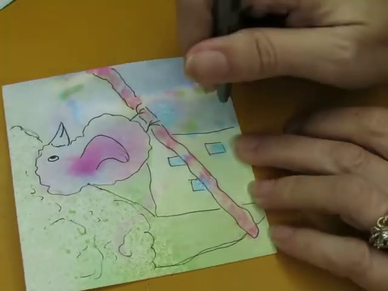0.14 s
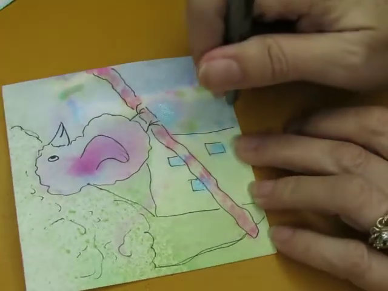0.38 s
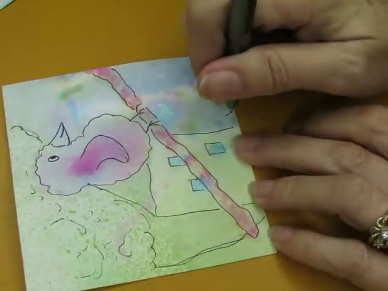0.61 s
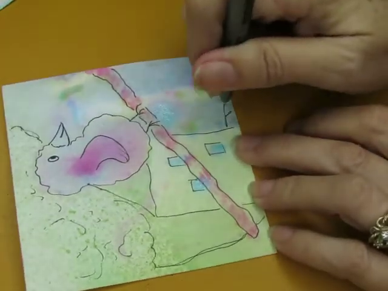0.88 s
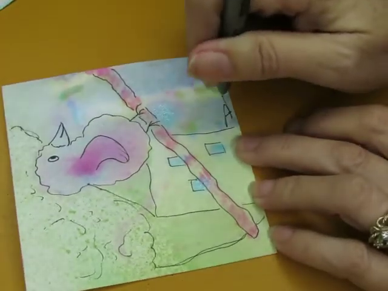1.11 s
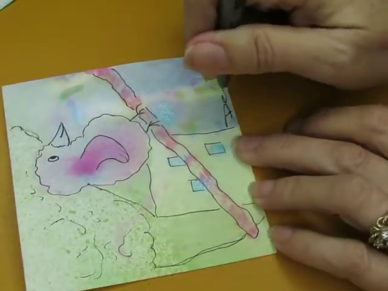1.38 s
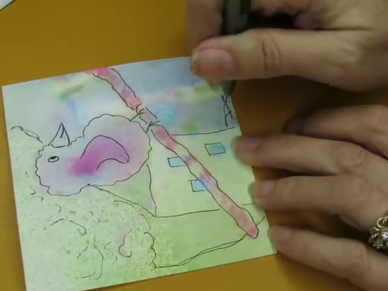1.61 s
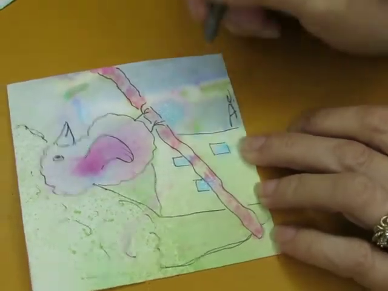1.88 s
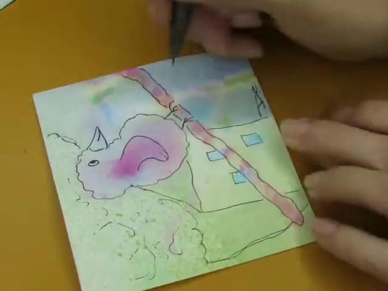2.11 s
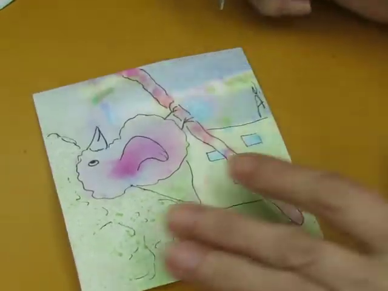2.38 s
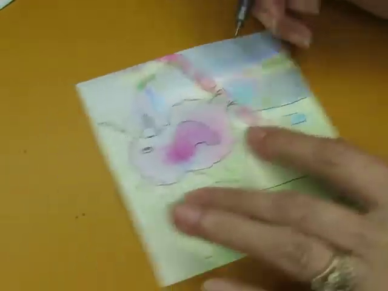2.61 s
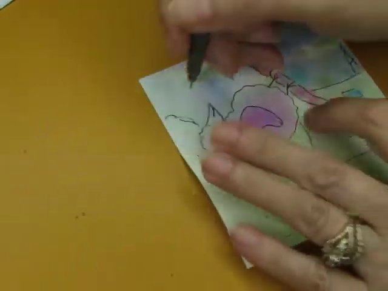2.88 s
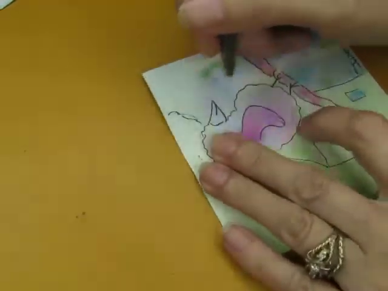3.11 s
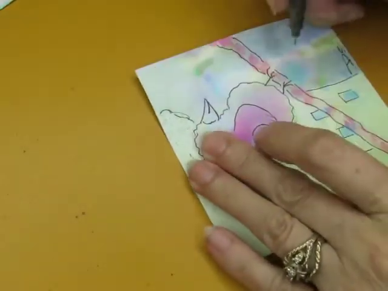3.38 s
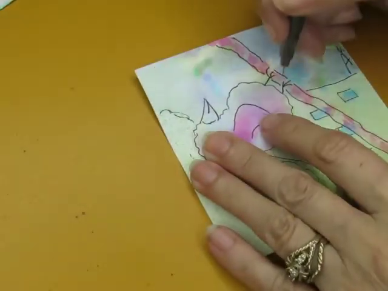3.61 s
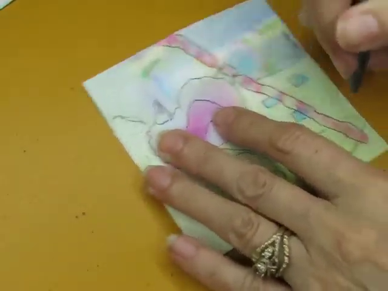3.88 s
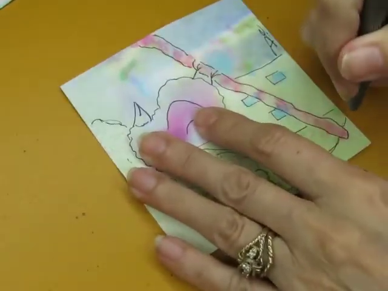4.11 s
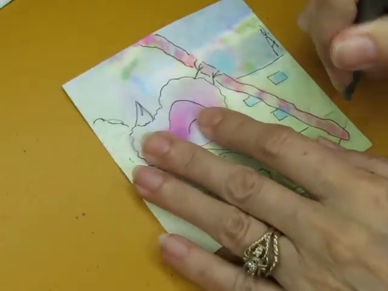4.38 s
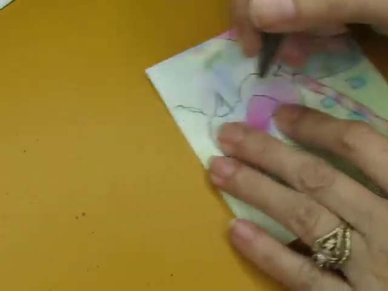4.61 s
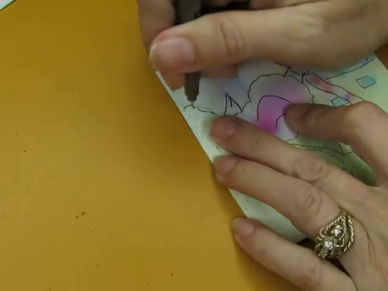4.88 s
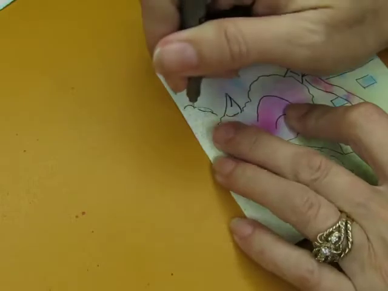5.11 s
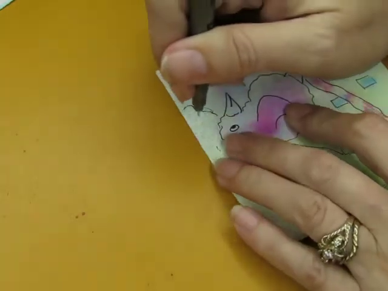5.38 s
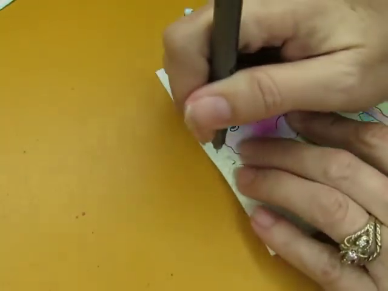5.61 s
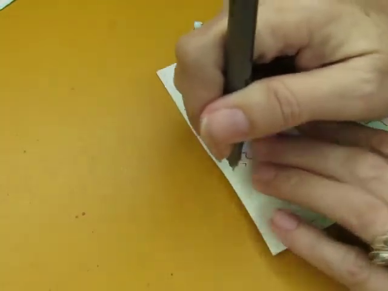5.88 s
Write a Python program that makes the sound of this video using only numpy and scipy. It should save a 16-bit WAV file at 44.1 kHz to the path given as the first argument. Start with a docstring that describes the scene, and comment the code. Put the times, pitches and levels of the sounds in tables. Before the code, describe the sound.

Faint pen strokes on paper in a quiet humming room, a sharp knock and scrape, then a paper sheet sliding over a wooden table.

```python
"""Over a quiet room's hiss, drone and motor tone, a sheet rubs faintly on a wooden table.
A fine pen makes short strokes, its nib dragging over fibres; two light taps ring the table top.
A stand is knocked and scrapes a moment: blows and slips ring its modes, and the jolted sheet rustles.
Then a hand slides the sheet several times, in overlapping swells of banded noise, amid more taps.
The pen taps down again near the end. Two close microphones hear it all."""
import sys
import numpy as np
from scipy import signal
from scipy.fft import rfft, irfft
from scipy.io import wavfile
from scipy.ndimage import uniform_filter1d

SR = 44100
rng = np.random.default_rng(int(sys.argv[2]) if len(sys.argv) > 2 else 0)


def store_wav(level_fs):
    """Save 16-bit WAV to argv[1]."""
    pcm = np.round(np.clip(np.atleast_2d(level_fs), -1, 1) * 32767)
    wavfile.write(sys.argv[1], SR, pcm.T.astype(np.int16))


def field_ratio(decibels):
    """Amplitude ratio for a level in dB (20 dB per decade); scalars and array-likes work."""
    return 10 ** (np.asarray(decibels, dtype=float) / 20)


N = 264600
T = np.arange(N) / SR  # s
F = np.maximum(np.arange(N // 2 + 1) * SR / N, 1)  # Hz, kept off 0 for the logs


def level(x, db):
    """Scale to an rms level."""
    return x * field_ratio(db) / np.sqrt(np.mean(x ** 2))


def shape(points):
    """Gain over frequency from (f/Hz, gain/dB) points, joined on a log axis."""
    hz, db = np.transpose(points)
    return field_ratio(np.interp(np.log(F), np.log(hz), db))


def bump(hz, width_hz):
    """Gain of one resonance, -3 dB at the edges of its width."""
    return 1 / np.sqrt(1 + (2 * (F - hz) / width_hz) ** 2)


def colour(x, gain):
    """Filter by a gain over frequency."""
    return irfft(rfft(x) * gain, N)


def walk(rate_hz):
    """Random levels held 1 / rate_hz and slewed twice; spread near 1."""
    k = int(SR / rate_hz)
    held = np.repeat(rng.standard_normal(N // k + 1), k)
    return 1.71 * uniform_filter1d(uniform_filter1d(held, k), k)[:N]


def grit(spread_db, flicker_db, rate_hz):
    """Fibres catching: noise whose samples vary in size, under a quick flicker."""
    size_db = spread_db * rng.exponential(size=N)
    return rng.standard_normal(N) * field_ratio(size_db + flicker_db * walk(rate_hz))


def patchy(x, patchy_db, rate_hz):
    """Narrow bands of a rub swell and fade apart as the contact shifts."""
    spectrum = rfft(x)
    place = 5 * np.log2(F / 200)  # five bands an octave
    out = 0
    for k in range(33):
        band = irfft(spectrum * np.clip(1 - abs(place - k), 0, 1), N)
        out = out + band * field_ratio(patchy_db * walk(rate_hz))
    return out


def half_sine(start_s, length_s):
    """Speed of one movement: up from rest and down again."""
    return np.sin(np.pi * np.clip((T - start_s) / length_s, 0, 1)).clip(0)


def push(contact_ms):
    """A smooth push of unit area; a longer contact is duller."""
    form = np.sin(np.pi * np.clip(T[:128] * 1000 / contact_ms, 0, 1)) ** 2
    return form / np.sum(form)


def ring(force, modes, low_hz, damping=1, sense=-1):
    """Modes answer a force, neighbours with or against each other; the small body radiates no deep bass."""
    out = 0
    for k, (hz, db, t60_s) in enumerate(modes):
        pole = np.exp(2j * np.pi * hz / SR - damping * np.log(1000) / (t60_s * SR))
        mode = signal.lfilter([1], [1, -pole], force).imag
        out = out + sense ** k * field_ratio(db) * mode
    return signal.sosfilt(signal.butter(3, low_hz, "high", fs=SR, output="sos"), out)


def scatter(x, decay_ms):
    """A short, dense cluster of reflections of unit energy."""
    path = rng.standard_normal(1024) * np.exp(-T[:1024] * 1000 / decay_ms)
    return signal.fftconvolve(x, path / np.sqrt(np.sum(path ** 2)))[:N]


def spread(mid, side_points):
    """Two ports: the side carries the same sound through a scattered path."""
    side = colour(scatter(mid, 9.1), shape(side_points))
    return np.array([mid + side, mid - side])


# room hiss spectrum: (f/Hz, relative density/dB)
AIR_SPECTRUM = [(12, -43), (20, -21), (59, -2.5), (112, -7.5), (175, -1), (245, -9), (404, -10),
                (505, -12.5), (834, -14), (1070, -18.5), (1160, -18.5), (3450, -27.5), (11400, -42.5),
                (14300, -46), (15500, -76)]
# side over mid: (f/Hz, gain/dB)
AIR_SIDE_GAIN = [(30, -19), (60, -7), (125, -13.5), (250, 9), (500, 5), (1000, 4), (3000, 2), (8000, 1),
                 (14000, 0.5)]
# drone, narrow noise bands: (f/Hz, -6 dB width/Hz, level/dB)
DRONE_BANDS = [(161, 41, -59.5), (411, 50, -66), (578, 36, -67)]
AIR_DB = -53  # before flicker
MOTOR_HZ, MOTOR_DB = 71, -62


def air_bed():
    """Flickering hiss of the room air plus narrow noise bands of the drone."""
    hiss = level(colour(rng.standard_normal(N), shape(AIR_SPECTRUM)), AIR_DB) * field_ratio(0.99 * walk(15))
    drone = sum(level(colour(rng.standard_normal(N), bump(hz, width_hz) ** 2), db)
                for hz, width_hz, db in DRONE_BANDS)
    return hiss + drone


def motor():
    """A sine wavering in pitch and level."""
    phase = 2 * np.pi * np.cumsum(MOTOR_HZ + 2 * walk(5)) / SR
    return level(np.sin(phase) * field_ratio(2 * walk(3.19)), MOTOR_DB)


def air():
    """Air, drone and motor tone at two ports; the side is weak in the deep bass, so both ports agree there."""
    mid = air_bed() + motor()
    side = colour(air_bed(), shape(AIR_SIDE_GAIN))
    return np.array([mid + side, mid - side])


ROOM_T60_S, ROOM_DB = 0.083, -29  # ROOM_DB: tail energy re direct


def room(near):
    """Decaying noise tails, independent at each port, 6 ms after the direct sound."""
    t = T[:SR // 2]
    tail = rng.standard_normal((2, SR // 2)) * field_ratio(-60 * t / ROOM_T60_S) * (t > .006)
    tail = level(tail, ROOM_DB) / np.sqrt(SR // 2)
    return signal.fftconvolve(near[None], tail, axes=1)[:, :N]


# stand modes: (f/Hz, level/dB, t60/s at damping 1)
STAND_MODES = [(274, -9, 0.055), (370, -13.5, 0.048), (580, -1.5, 0.042), (710, -2.5, 0.022),
               (1000, -9.5, 0.05), (1103, -7, 0.047), (1323, -11.5, 0.075), (1460, -8, 0.039),
               (1680, 6.5, 0.01), (2020, -1, 0.021), (2327, -6.5, 0.022), (2660, -4, 0.014),
               (3000, -8, 0.029), (3240, -12.5, 0.024), (3670, -9.5, 0.01), (4300, -6.5, 0.0057),
               (5070, -7, 0.0035)]
# knocks: (t/s, force level/dB, contact/ms)
KNOCKS = [(1.9324, -17.5, 0.14), (1.9336, -11, 0.41), (1.934, -14, 0.26), (2.04, -25, 0.33),
          (2.046, -37, 0.16)]
# foot scraping: (t/s, level/dB, dullness 0-1)
SCRAPE_TRACK = [(1.9315, -45, 0.3), (1.934, -20, 0.15), (1.944, -22.5, 0.55), (1.96, -18, 0.26),
                (1.985, -21.5, 0.26), (2.007, -19.5, 0.4), (2.023, -31, 0.9), (2.036, -25, 0.7),
                (2.042, -17, 0.43), (2.055, -27.5, 0.47), (2.07, -35.5, 0.72), (2.09, -41.5, 0.72),
                (2.1, -57.5, 0), (2.16, -61.5, 0)]
RUSTLE_START_S, RUSTLE_END_S, RUSTLE_STOP_S = 1.933, 2.165, 0.037
RUSTLE_DB, RUSTLE_FADE_DB_S = -44, 60  # level at start, fade rate


def knocks():
    """Brief blows ring the stand, more damped than in the scrape, treble rolled off."""
    force = np.zeros(N)
    for s, db, contact_ms in KNOCKS:
        i = int(s * SR)
        force[i:i + 128] += field_ratio(db) * push(contact_ms)
    return colour(ring(force, STAND_MODES, 300, damping=1.43, sense=1), 1 / (1 + (F / 6500) ** 4))


def scrape():
    """A dense run of slips rings the stand, blended between dull and sharp contact."""
    s, db, dull = np.transpose(SCRAPE_TRACK)
    dull = np.interp(T, s, dull).clip(0, 1)
    gain = field_ratio(np.interp(T, s, db, -120, -120))
    slips = patchy(grit(2.2, 1.2, 200), 2.07, 70)
    soft = level(ring(colour(slips, bump(565, 250)), STAND_MODES, 364), 0)
    sharp = level(ring(colour(slips, bump(1600, 4900)), STAND_MODES, 830), 0)
    return gain * (dull * soft + (1 - dull) * sharp)


def rustle():
    """The jolted sheet: sparse bright grit fading steadily until it lies still."""
    tone = bump(3900, 3000) / (1 + (3500 / F) ** 4)
    noise = level(colour(grit(3.4, 0.71, 70.2), tone), 0)
    moving = (T > RUSTLE_START_S) * np.clip((RUSTLE_END_S - T) / RUSTLE_STOP_S, 0, 1)
    return noise * moving * field_ratio(RUSTLE_DB - RUSTLE_FADE_DB_S * (T - RUSTLE_START_S).clip(0))


def stand():
    """Knocks and slips ring the stand while the sheet rustles."""
    return knocks() + scrape() + rustle()


# table-top modes: (f/Hz, level/dB, t60/s)
TABLE_MODES = [(392, -1.5, 0.035), (638, -8, 0.044), (798, -10.5, 0.063), (1094, -6, 0.073),
               (1640, -4.5, 0.01), (2620, -1.5, 0.01), (3700, -3, 0.0069), (5280, 2, 0.0054),
               (8000, 1, 0.0024)]
# pen and fingers touching down: (t/s, force level/dB, contact/ms, chatter decay/ms, weight left on table 0-1)
TOUCHES = [(1.619, -53.5, 0.097, 8.4, 0.1), (1.814, -52.5, 0.11, 11, 0), (2.497, -49, 0.39, 4.7, 0.5),
           (2.587, -43, 0.12, 2.4, 0), (2.976, -46, 0.33, 11, 0.6), (2.989, -44.5, 0.32, 3.9, 0),
           (5.608, -45.5, 0.23, 14, 1), (5.633, -41.5, 0.63, 9.1, 1), (5.658, -47.5, 0.23, 10, 1),
           (5.683, -43, 0.91, 8.4, .9), (5.848, -44, 0.24, 17, 1)]


def taps():
    """A first contact and smaller chatter ring the table; a light touch rebounds and loses its lows."""
    force = np.zeros(N)
    for s, db, contact_ms, chatter_ms, weight in TOUCHES:
        chatter = 0.1 * rng.standard_normal(1024) * np.exp(-T[:1024] * 1000 / chatter_ms)
        chatter[0] = 1
        touch = np.convolve(chatter, push(contact_ms))[:1024]
        rebound = np.clip(1 - weight, 0, 1) * np.roll(touch, shift=7)
        i = int(s * SR)
        force[i:i + 1024] += field_ratio(db) * (touch - rebound)
    return ring(force, TABLE_MODES, 250)


# pen strokes: (start t/s, length/s, peak level/dB)
PEN_STROKES = [(0.62, 0.064, -62.5), (0.725, 0.1, -61), (0.852, 0.1, -58.5), (0.975, 0.085, -62),
               (1.097, 0.097, -58), (1.302, 0.045, -65), (1.382, 0.072, -61)]
# nib and barrel resonances: (f/Hz, -6 dB width/Hz, level/dB)
NIB_RESONANCES = [(2820, 1500, 3.5), (4950, 2900, -5.5), (7200, 660, -1), (9000, 1300, -3),
                  (10800, 1100, -0.5), (12160, 1100, -1), (13800, 1300, -6)]


def pen():
    """Each stroke speeds up and slows down; the nib drags over fibres."""
    speed = sum(field_ratio(db) * np.sqrt(half_sine(s, length_s)) for s, length_s, db in PEN_STROKES)
    nib = np.sqrt(sum((field_ratio(db) * bump(hz, width_hz) ** 2) ** 2 for hz, width_hz, db in NIB_RESONANCES))
    drag = patchy(grit(1.0, 1.6, 59.7), 1.4, 29.7)
    return speed * level(colour(drag, nib), 0)


# sheet hiss spectrum: (f/Hz, relative density/dB)
SHEET_SPECTRUM = [(410, -44), (700, -12), (1300, 0), (1560, -7.5), (1800, -0.5), (2050, -5.5), (2530, -0.5),
                  (2910, -0.5), (4640, -1.5), (5640, -6.5), (11400, -6.5), (13600, -9), (15500, -2.5)]
# sheet resonances: (f/Hz, width/Hz, gain over the rest/dB)
SHEET_RESONANCES = [(1810, 120, 6), (4200, 2800, 4), (7140, 210, 4.5), (1300, 80, 2)]
# sheet and hands rubbing the table; overlapping rows build up pushes, their tails and faint resting contact:
# (start t/s, length/s, mid-band peak level/dB, treble re mid/dB, lows re mid/dB)
RUB_SWELLS = [(-0.12, 0.25, -66, -1.5, -1), (0.08, 0.23, -77, -10, -7), (0.294, 0.18, -70, -20, -6),
              (0.44, 0.18, -74.5, -20, 3), (2.147, 0.33, -73, -15, 0), (2.4, 0.33, -65.5, -3.5, 2.5),
              (2.572, 0.26, -42, -1, -9), (2.799, 0.12, -57.5, -6, -7), (2.845, 1.74, -70.5, -6.5, -4),
              (2.913, 0.13, -58.5, -2.5, -2), (3.08, 0.16, -58, -7, -21), (3.162, 0.22, -62.5, -2.5, -9),
              (3.308, 0.12, -54.5, -5, -5), (3.462, 0.08, -73, -6, -2), (3.585, 0.15, -73, -1, -7),
              (3.73, 0.36, -49, -3.5, -2.5), (3.917, 0.16, -50, -11, -4.5), (4.13, 0.26, -62, -9.5, -4.5),
              (4.439, 0.3, -45.5, -1.5, -3), (4.637, 0.15, -55, -0.5, -1.5), (4.742, 0.24, -62.5, -5, -13),
              (4.98, 0.35, -80, -2, -7), (5.308, 0.5, -67, -6.5, -12), (5.56, 0.16, -65.5, -9, -2),
              (5.77, 0.052, -70, -5, -8), (5.82, 0.37, -61.5, -3.5, -0.5)]


def slide():
    """The sheet hisses over wood; each swell rises and dies with its own balance of lows, mids and treble."""
    sheet = shape(SHEET_SPECTRUM)
    for hz, width_hz, db in SHEET_RESONANCES:
        sheet = sheet * (1 + (field_ratio(db) - 1) * bump(hz, width_hz) ** 2)
    low = 1 / (1 + (F / 2300) ** 8)
    high = 1 / (1 + (6500 / F) ** 8)
    noise = patchy(grit(1.64, 0.75, 50), 1.7, 30)
    parts = ((1 - low) * (1 - high), high, low)
    bands = [level(colour(noise, sheet * np.sqrt(part)), 0) for part in parts]
    power = np.zeros((3, N))  # mids, treble, lows
    for s, length_s, db, treble_db, low_db in RUB_SWELLS:
        band_db = db + np.array([[0], [treble_db], [low_db]])
        power += (field_ratio(band_db) * half_sine(s, length_s)) ** 2
    return np.sum(np.sqrt(power) * bands, axis=0)


# side over mid, near sounds: (f/Hz, gain/dB)
NEAR_SIDE_GAIN = [(300, -18), (1000, -18), (2500, -15.5), (5000, -10.5), (9000, -5.5), (14000, -5)]


def scene():
    """Near sounds with a short room tail over the air."""
    near = pen() + slide() + stand() + taps()
    return spread(near, NEAR_SIDE_GAIN) + room(near) + air()


def top_cut(x):
    """Nothing passes above the cut-off."""
    return signal.sosfilt(signal.butter(12, 16040, fs=SR, output="sos"), x)


TOP_HZ = 14250


def record(dry):
    """A steep low-pass trims the top of the finished mix."""
    mix = signal.sosfilt(signal.butter(12, TOP_HZ, fs=SR, output="sos"), dry)
    return top_cut(mix)


dry = scene()
out = record(dry)
store_wav(out)
```